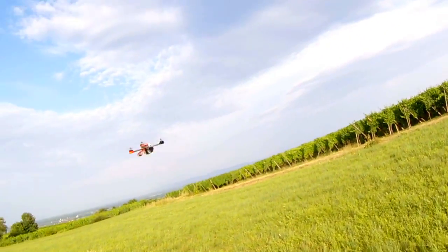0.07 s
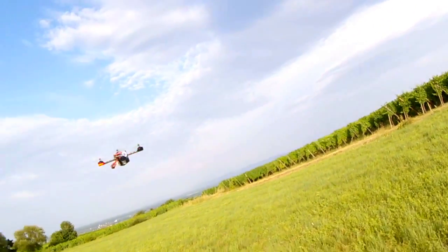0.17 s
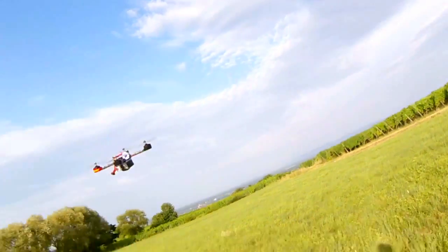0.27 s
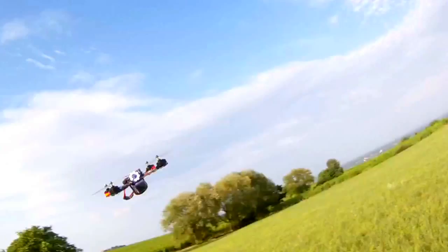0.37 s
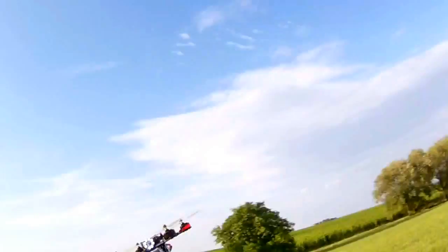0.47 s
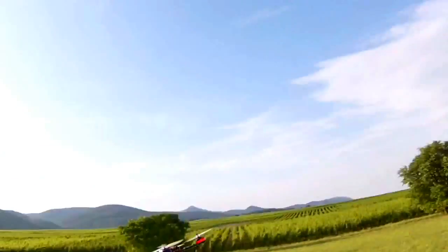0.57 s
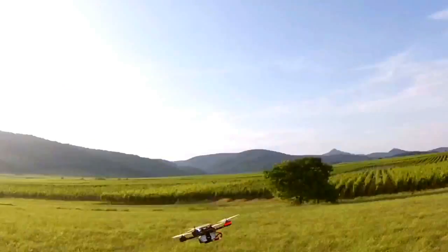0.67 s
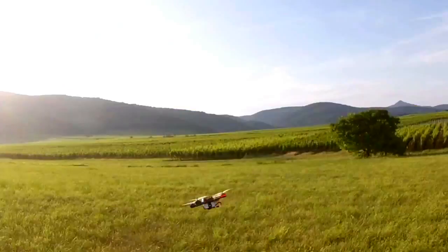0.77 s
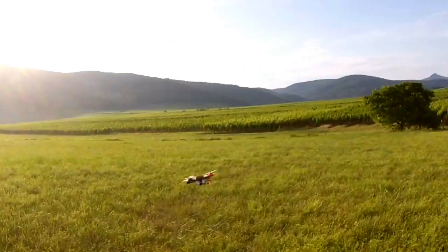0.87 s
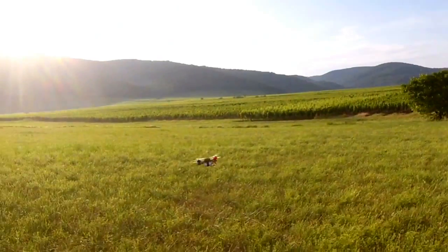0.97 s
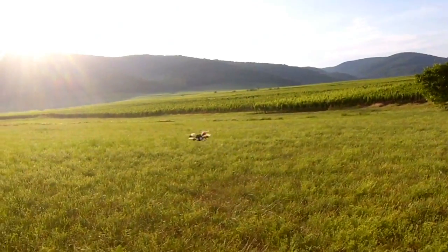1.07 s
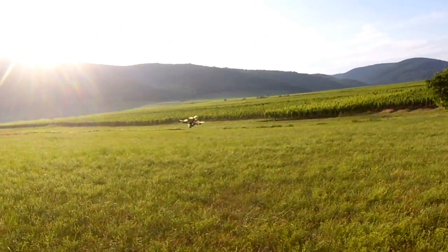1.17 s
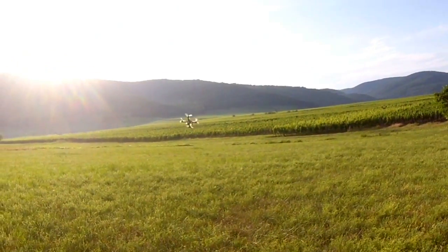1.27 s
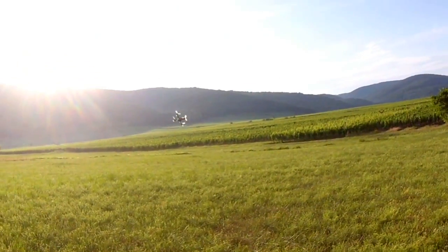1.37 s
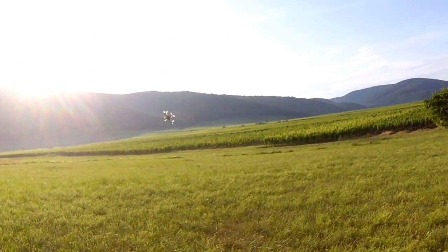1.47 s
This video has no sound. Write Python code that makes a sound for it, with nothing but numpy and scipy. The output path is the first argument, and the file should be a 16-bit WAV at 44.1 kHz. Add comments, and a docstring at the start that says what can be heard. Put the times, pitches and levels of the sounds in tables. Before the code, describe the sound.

A small racing drone whines nearby with a buzzing, wavering chord and rough propeller wash, a few sharp ticks, then a sudden piercing rise in pitch, falling quickly to a faint whirr; open field, close mono microphone, dry.

```python
"""A racing quadcopter with three-bladed propellers cruises close to the microphone over an open field.
Each motor sings its blade tone, overtones and weaker shaft orders, summed sines at its own wavering speed.
Noise chopped by the near blades makes a rough wash; short pressure kicks make a few sharp slaps.
Then the throttle is punched: the motors race upward and the shafts hum louder.
The craft drops away, its motors slowing, and a breathy whistle of narrow-band noise rises over faint hiss."""
import sys
import numpy as np
from scipy.fft import rfft, irfft, next_fast_len
from scipy.io import wavfile
from scipy.ndimage import uniform_filter1d, map_coordinates

SR = 44100
rng = np.random.default_rng(int(sys.argv[2]) if len(sys.argv) > 2 else 0)


def generate_wav(signal):
    """Clip the signal to [-1, 1] and save it as 16-bit WAV at the path in sys.argv[1]."""
    frames = np.transpose(np.atleast_2d(signal))
    scaled = np.clip(frames, -1, 1) * 32767
    pcm = np.round(scaled).astype(np.int16)
    wavfile.write(sys.argv[1], SR, pcm)


N = 68355  # samples
TIME = np.arange(N) / SR  # seconds
BLADES = 3  # on each propeller

# The two near motors. Each row: time in seconds, blade rate in Hz, blade tone in dB, its octave in dB.
LEAD_MOTOR = [(0,566.6,-65.5,-69),(.06,577.2,-58.5,-67),(.16,577.4,-53.5,-63),(.205,574.5,-49.5,-48.5),(.345,564.8,-49,-51.5),(.385,559,-68,-49),(.41,564.5,-49,-48),(.45,564.3,-64.5,-47.5),(.485,547.8,-54.5,-48),(.56,557.9,-48,-46),(.63,551,-57,-54.5),(.69,554,-45,-47),(.76,549.3,-45.5,-70),(.812,556,-52.5,-54),(.836,576.4,-50,-45),(.868,599.7,-58.5,-45),(.9,641.6,-63,-52.5),(.933,708,-57.5,-43),(.953,765,-40.5,-39),(.975,821.4,-36,-50),(.996,929.8,-30.5,-65),(1.025,931.6,-30.5,-59),(1.055,996.4,-28.5,-54),(1.085,1016,-27.5,-62.5),(1.13,960.6,-33.5,-54.5),(1.168,986.2,-33,-58),(1.21,902.7,-40.5,-50),(1.24,799.5,-52,-69),(1.278,801,-53.5,-62.5),(1.30,685,-63,-65),(1.32,595.8,-49,-72),(1.352,670.2,-58,-57),(1.378,684,-58.5,-64),(1.398,555.5,-51.5,-70),(1.425,553.7,-64,-71),(1.455,607,-53,-64),(1.485,561.8,-65.5,-69),(1.55,539.7,-60.5,-61)]
SECOND_MOTOR = [(0,489,-71,-65),(.06,489.5,-54.5,-61.5),(.182,493.2,-52.5,-60),(0.291,501.6,-46,-58),(.365,503,-59,-52.5),(.40,498.6,-53.5,-61),(.46,504.8,-50.5,-47),(.53,498.6,-59.5,-59),(.59,493.1,-53.5,-54),(.67,502.3,-57.5,-57),(.79,485,-60,-63),(.86,498.9,-54,-64.5),(0.911,573.9,-59,-51),(1.0,637.5,-54.5,-62),(1.012,728.4,-57.5,-59),(1.03,752,-45,-66.5),(1.069,774,-50.5,-63),(1.093,765.7,-50,-58),(1.128,799.5,-49.5,-65.5),(1.18,727.6,-53,-53),(1.21,701.2,-62.5,-59),(1.246,666.3,-49.5,-65.5),(1.275,556.4,-63,-63),(1.33,595,-60,-73),(1.421,536.4,-73.5,-63.5),(1.55,499,-72,-69)]
# The two far motors. Each row: time in seconds, blade rate in Hz, octave of the blade tone in dB.
THIRD_MOTOR = [(0,609,-83),(.14,597.7,-73),(0.249,574,-80),(.64,585.2,-58.5),(0.961,560,-59),(1.011,620.3,-45),(1.075,645,-55.5),(1.151,605,-55),(1.211,582,-52.5),(1.259,528,-58.5),(1.4,580,-79.5),(1.55,580,-66)]
FOURTH_MOTOR = [(0,500,-63.5),(0.454,485.3,-56),(.779,490,-58),(.939,701.7,-58),(1.039,790,-62),(1.085,778,-59),(1.13,678,-48),(1.201,730,-63.5),(1.55,488.3,-77.5)]


def amp(db):
    """Decibels to gain."""
    return 10 ** (np.asarray(db) / 20)


def unit(x):
    """Scale to rms 1."""
    return x / np.sqrt(np.mean(x ** 2) + 1e-20)


def along(points, hz):
    """Read (Hz, value) points at any frequency, on a log axis."""
    f, v = np.transpose(points)
    return np.interp(np.log(hz + 1), np.log(f + 1), v)


def curves(rows):
    """One value per sample for each column after the time, corners rounded."""
    s, *columns = np.transpose(rows)
    return [uniform_filter1d(np.interp(TIME, s, column), size=500) for column in columns]


def wobble(rate):
    """A smooth random curve through `rate` random knots a second."""
    knots = rng.standard_normal(2048)
    return map_coordinates(knots, [TIME * rate], mode="wrap")


def filtered(x, response):
    """Multiply the spectrum of x by a gain that depends on frequency."""
    m = next_fast_len(N + 8192)  # room for the filter to ring out
    return irfft(rfft(x, m) * response(np.fft.rfftfreq(m, 1 / SR)), m)[:N]


def noise(spectrum, gate=1):
    """Noise chopped by a gate, then coloured and set to rms 1."""
    return unit(filtered(gate * rng.standard_normal(N), lambda hz: amp(along(spectrum, hz))))


def shaft_angle(blade_hz):
    """The turning of a shaft whose speed hunts a little, and more while it speeds up or brakes."""
    waver, waver_rate = 0.0016, 45  # share of the speed, knots per second
    jitter, jitter_rate = 0.0035, 400
    strain_s = 0.74  # extra hunting per relative change of speed a second
    strain = 1 + strain_s * np.abs(np.gradient(np.log(blade_hz))) * SR
    hunting = strain * (waver * wobble(waver_rate) + jitter * wobble(jitter_rate))
    turns_per_second = blade_hz / BLADES * (1 + hunting)
    return 2 * np.pi * (np.cumsum(turns_per_second) / SR + rng.random())


def partial(angle, flutter_db, rate):
    """A sine, rms 1 before its strength flutters in the turbulent air."""
    sine = np.sin(angle + 2 * np.pi * rng.random())
    return np.sqrt(2) * sine * amp(flutter_db * wobble(rate))


def motors(angles, second_db=-6, far_db=-12):
    """Four motors at their own speeds; overtones and rasp are trimmed on all but the lead one."""
    far_tone_db = -12.5  # blade tone of the far motors against their octave
    _, lead_tone_db, lead_octave_db = curves(LEAD_MOTOR)
    _, second_tone_db, second_octave_db = curves(SECOND_MOTOR)
    out = propeller(angles[0], lead_tone_db, lead_octave_db, 0)
    out += propeller(angles[1], second_tone_db, second_octave_db, second_db)
    for angle, rows in zip(angles[2:], (THIRD_MOTOR, FOURTH_MOTOR)):
        _, octave_db = curves(rows)
        out += propeller(angle, octave_db + far_tone_db, octave_db, far_db)
    return out


def propeller(angle, tone_db, octave_db, trim_db):
    """Blades sound at one to four times the blade rate; the rasp adds further shaft multiples."""
    # Bite of the blades before the motor's trim. Each row: time in seconds,
    # three times the blade rate in dB, four times the blade rate in dB.
    overtones = [(0,-66,-82),(.14,-64.5,-74),(.22,-56.5,-65),(.29,-63,-67),(.385,-71,-62),(.44,-75,-60),(.485,-54.5,-66),(.6,-50.5,-64),(.655,-58.5,-71),(.70,-56.5,-83),(.735,-57,-52),(.77,-62,-78),(.87,-60,-75.5),(.935,-65.5,-58.5),(.975,-67,-75),(1.11,-67,-84.5),(1.19,-74.5,-80),(1.25,-64,-87),(1.32,-76,-83),(1.55,-84,-86)]
    # Rasp, with five times the blade rate among it. Each row: multiple of the shaft rate,
    # level in dB against three times the blade rate.
    shaft_orders = [(4,-17.5),(5,-16),(7,-11.5),(8,-8.5),(11,-22),(15,-13),(20,-31.5)]
    third_db, fourth_db = np.array(curves(overtones)) + trim_db
    out = amp(tone_db) * partial(BLADES * angle, flutter_db=0.3, rate=160)
    for k, db in enumerate((octave_db, third_db, fourth_db), 2):
        out += amp(db) * partial(k * BLADES * angle, flutter_db=2.08, rate=90)
    for k, db in shaft_orders:
        out += amp(third_db + db) * partial(k * angle, flutter_db=4.5, rate=45)
    return out


def imbalance(angles, second_db=-15):
    """The two near propellers, out of balance, hum once and twice per turn."""
    # Hum of the lead propeller. Each row: time in seconds, once per turn in dB, twice per turn in dB.
    hum = [(0,-73.5,-62.5),(.2,-74.5,-62.5),(.32,-75.5,-69),(.42,-69.5,-59),(.75,-72.5,-80),(.92,-71,-59),(.995,-52,-67.5),(1.09,-50,-62.5),(1.19,-55.5,-59.5),(1.24,-71,-66),(1.55,-82.5,-76.5)]
    out = np.zeros(N)
    for angle, trim_db in zip(angles, (0, second_db)):
        for k, db in enumerate(curves(hum), 1):
            out += amp(db + trim_db) * partial(k * angle, flutter_db=3, rate=40)
    return out


def wash(angles, chop=0.48, gust_db=1.0, gust_rate=300):
    """Turbulent air in three bands; the near blades and uneven bursts chop the upper two."""
    # Wash before the band trims. Each row: time in seconds, low, middle and treble levels in dB.
    wash_levels = [(0.0,-64.5,-58,-74.5),(.14,-59,-53,-70.5),(.33,-63,-53.5,-70.5),(.378,-59.5,-49.5,-63),
                   (.44,-64.5,-53.5,-70.5),(.53,-56.5,-48,-67),(.7,-59.5,-48,-68.5),(.735,-61,-49.5,-63.5),
                   (.81,-57,-50.5,-70),(.84,-56,-51.5,-68.5),(.954,-64,-47,-63.5),(1.026,-59.5,-52,-72.5),
                   (1.1,-62,-55,-73.5),(1.226,-62,-58,-72.5),(1.424,-63.5,-67,-84.5),(1.55,-60,-63,-86)]
    low_trim_db, mid_trim_db = 2.5, 2
    # Colour of the three bands before levelling. Each row: frequency in Hz, gain in dB.
    low_air = [(25,-45.5),(50,-22),(100,-9),(180,-2.5),(280,4),(450,5.5),(700,0),(1100,7.5),(2500,-40.5)]
    mid_air = [(200,-39),(600,-4),(850,-5.5),(1300,5),(1700,-1),(2000,-3.5),(2400,-6.5),(2850,-11.5),(3300,-27.5),(6000,-51.5)]
    high_air = [(1500,-25),(2900,6),(4200,5),(5000,-1),(5600,-15),(7500,-19.5),(10000,-26),(15000,-28)]
    # Puffs of turbulent air on the microphone. Each row: centre in seconds, level in dB,
    # half length in seconds.
    puff_rows = [(0.668,-56,0.026),(1.313,-58,0.0099)]
    low_db, mid_db, high_db = curves(wash_levels)
    passes = sum(np.cos(BLADES * angle) for angle in angles[:2])  # one swing per blade pass
    gate = np.exp(chop * passes / 2) * amp(gust_db * wobble(gust_rate))
    puffs = sum(amp(db) * np.exp(-((TIME - s) / half) ** 2) for s, db, half in puff_rows)
    low = (amp(low_db + low_trim_db) + puffs) * noise(low_air)
    middle = amp(mid_db + mid_trim_db) * noise(mid_air, gate)
    treble = amp(high_db) * noise(high_air, gate)
    return hollow(low + middle + treble)


def hollow(air):
    """A narrow dip in the spectrum of the wash."""
    centre_hz, width_hz, depth_db = 689, 35, -4.5
    return filtered(air, lambda hz: amp(depth_db * np.exp(-((hz - centre_hz) / width_hz) ** 2)))


def slaps():
    """Turbulence slaps a blade: each slap is a pressure kick only a cycle or two long."""
    # Each row: centre in seconds, level in dB, pitch in Hz.
    slap_rows = [(0.0571,-34.5,1230),(0.38,-36.5,2970),(.476,-33,1500),(.685,-34,1380),(0.8373,-27,1234)]
    half_width = 0.9  # cycles
    out = np.zeros(N)
    for s, db, hz in slap_rows:
        cycles = (TIME - s) * hz
        out -= amp(db) * np.sin(2 * np.pi * cycles) * np.exp(-(cycles / half_width) ** 2)
    return out


def whistle():
    """A breathy whistle as the craft moves off: noise in a narrow band."""
    # Each row: time in seconds, level in dB.
    whistle_level = [(1.15,-94),(1.33,-65),(1.55,-70)]
    # Colour before levelling. Each row: frequency in Hz, gain in dB.
    whistle_band = [(1700,-39),(1930,-1.5),(2010,7),(2100,-2),(2450,-18),(2900,-46.5)]
    return amp(curves(whistle_level)[0]) * noise(whistle_band)


def hiss():
    """Faint, steady broadband noise behind everything."""
    # Colour before levelling. Each row: frequency in Hz, gain in dB.
    hiss_colour = [(100,1.5),(7000,3.5),(10000,-1),(15000,-2)]
    return amp(-77.5) * noise(hiss_colour)


def scene():
    """The quadcopter in open air over a faint hiss; the same shafts drive whine, hum and wash."""
    motor_rows = (LEAD_MOTOR, SECOND_MOTOR, THIRD_MOTOR, FOURTH_MOTOR)
    angles = [shaft_angle(curves(rows)[0]) for rows in motor_rows]
    craft = motors(angles) + imbalance(angles) + wash(angles) + slaps()
    return (craft + whistle() + hiss())[None]  # one channel


def record(dry):
    """The recorder keeps nothing from its band limit upward."""
    top_hz = 15200
    return np.array([filtered(x, lambda hz: hz < top_hz) for x in dry])


dry = scene()
out = record(dry)
generate_wav(out)
```